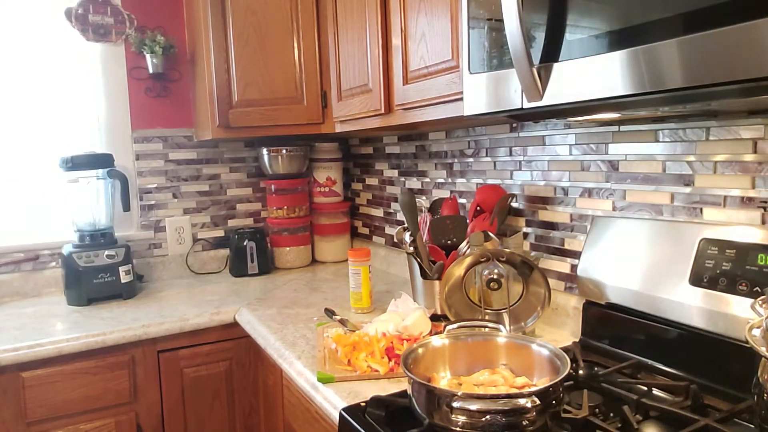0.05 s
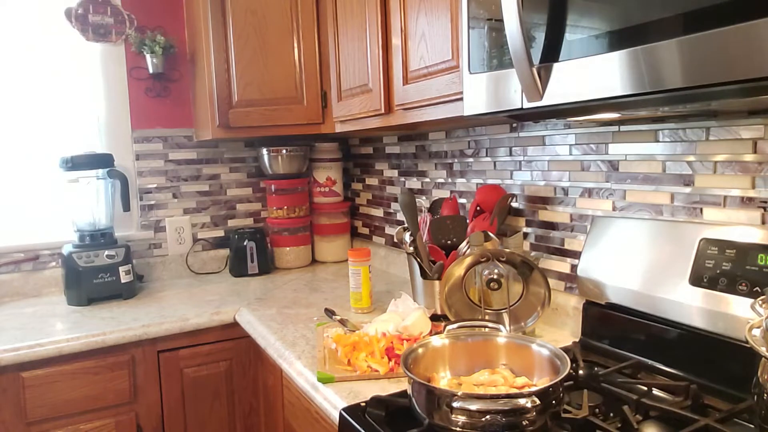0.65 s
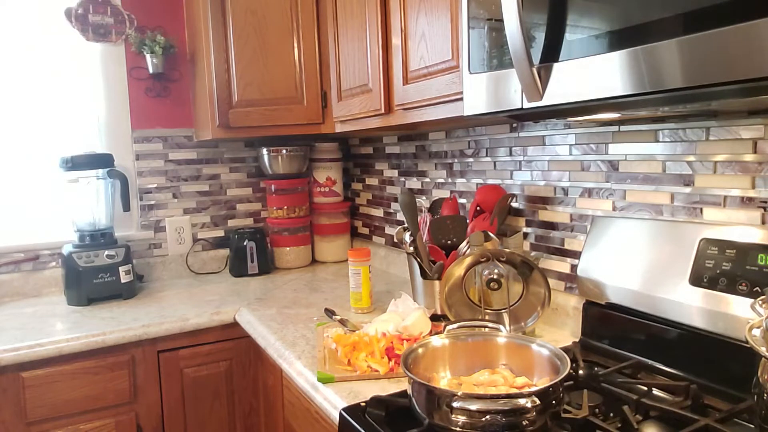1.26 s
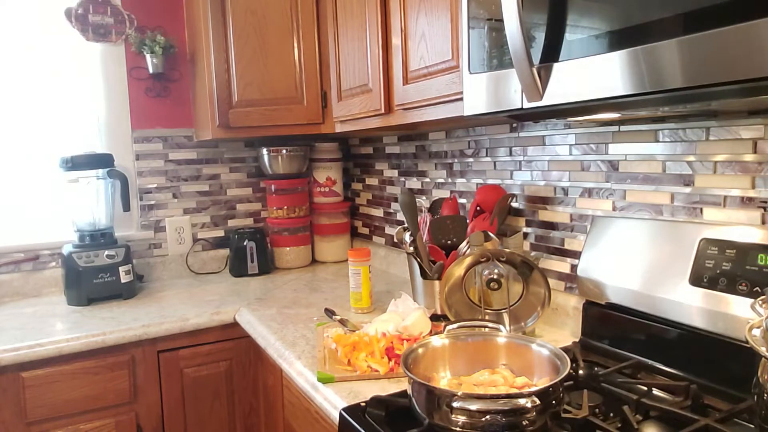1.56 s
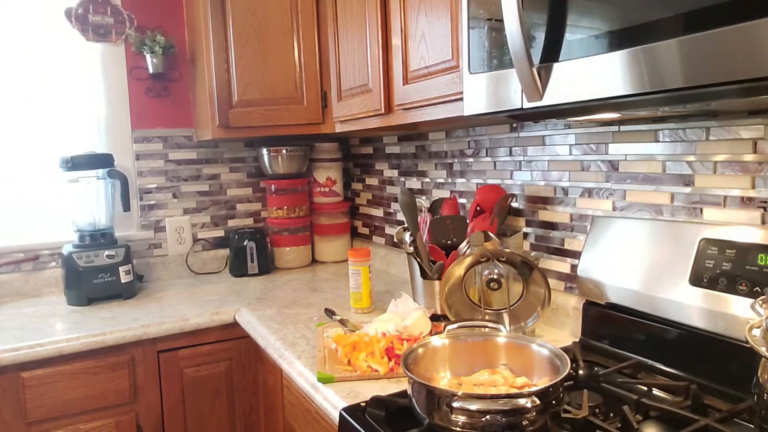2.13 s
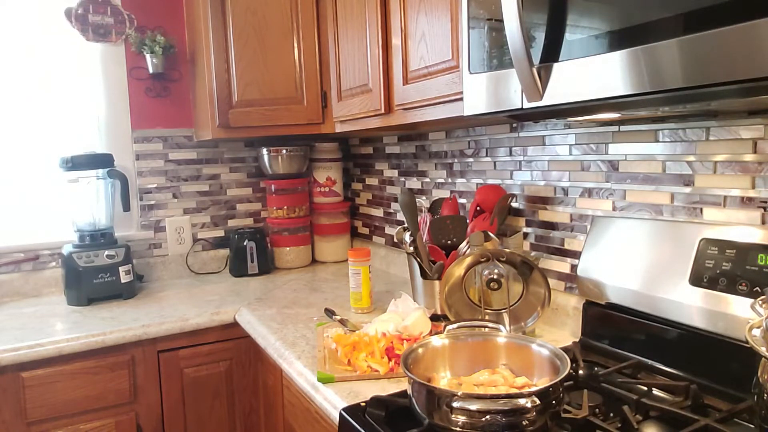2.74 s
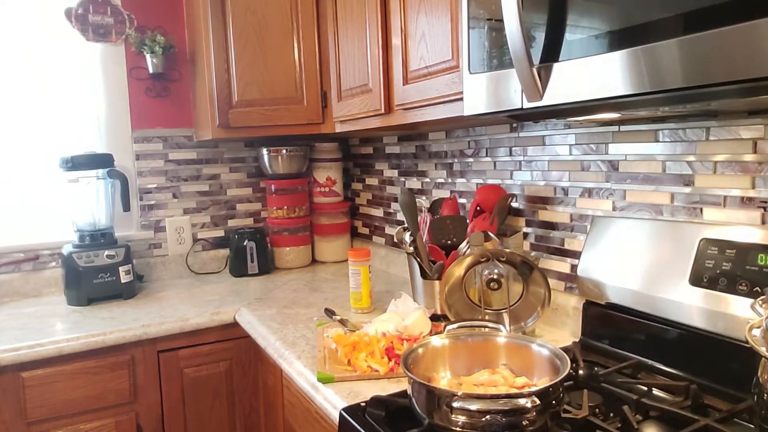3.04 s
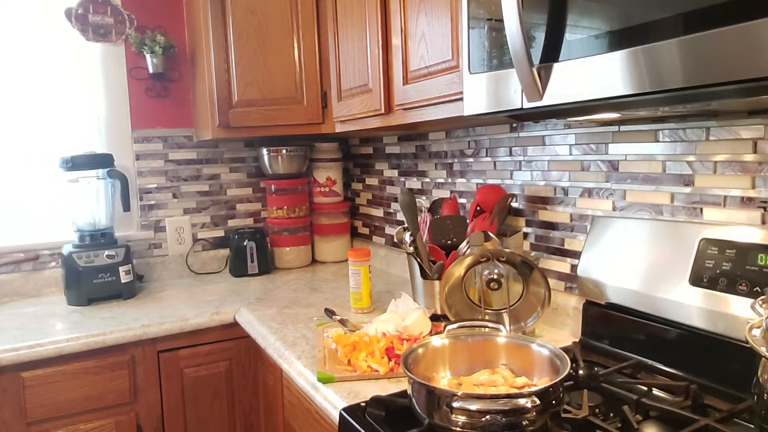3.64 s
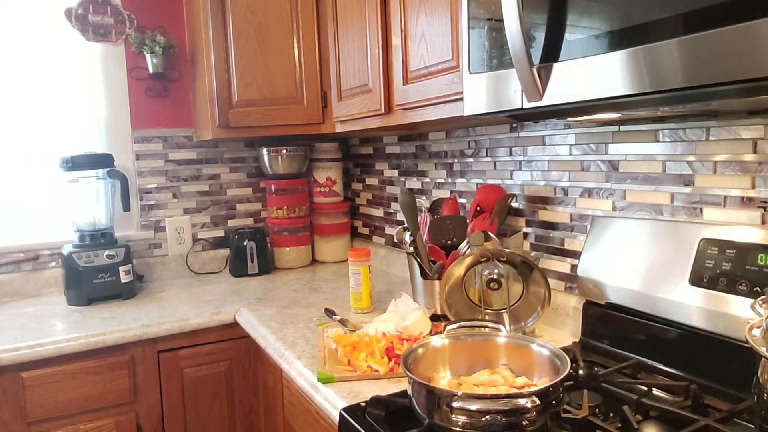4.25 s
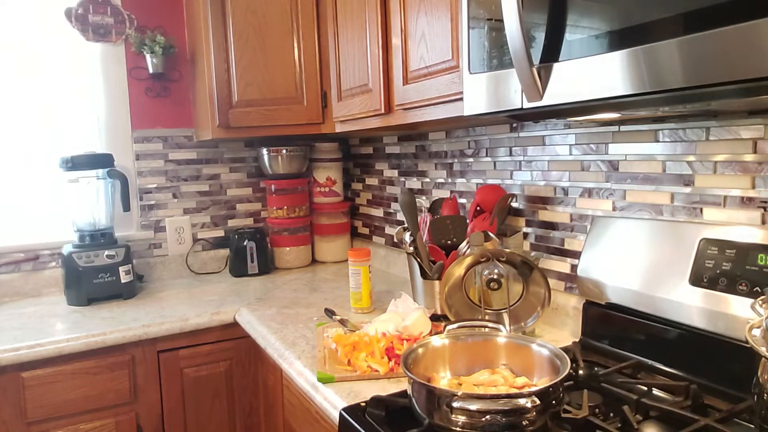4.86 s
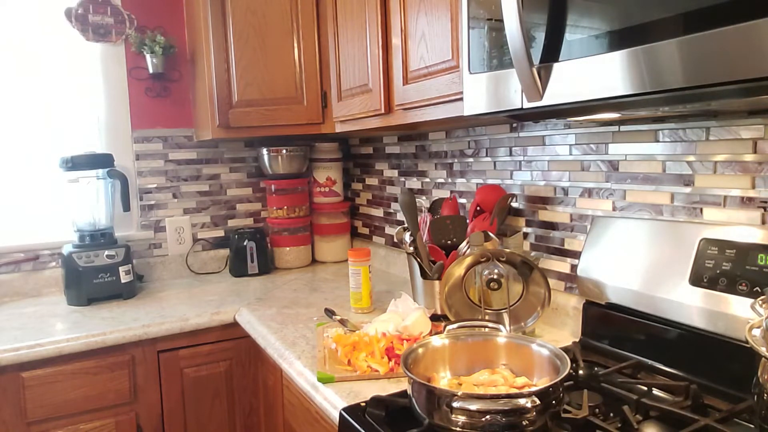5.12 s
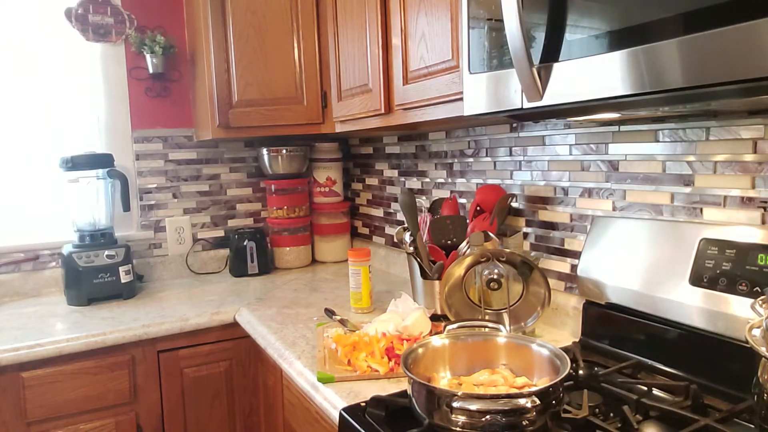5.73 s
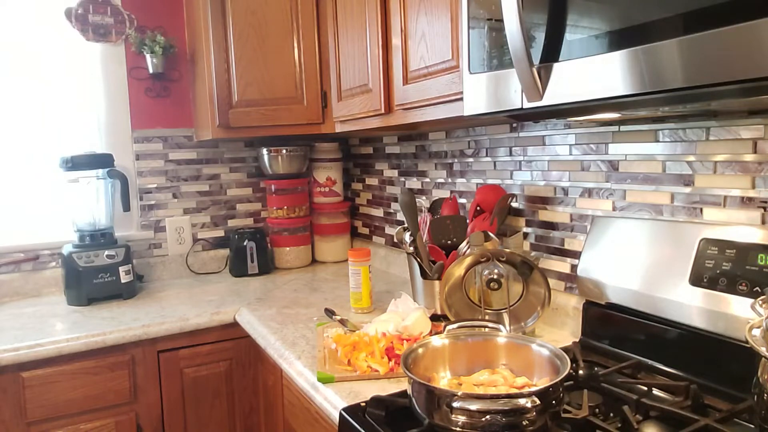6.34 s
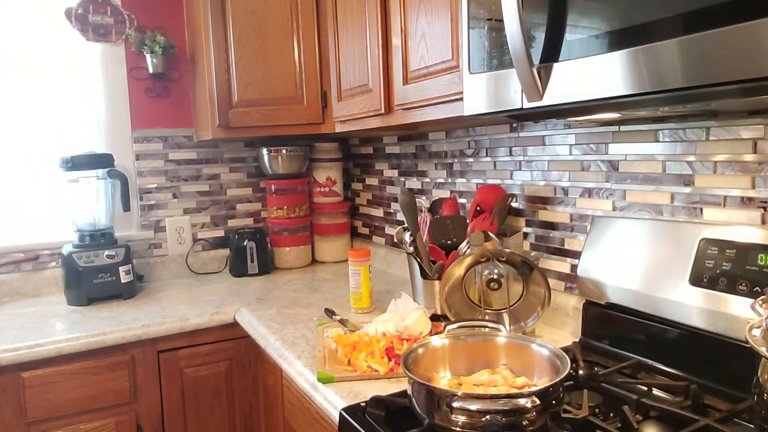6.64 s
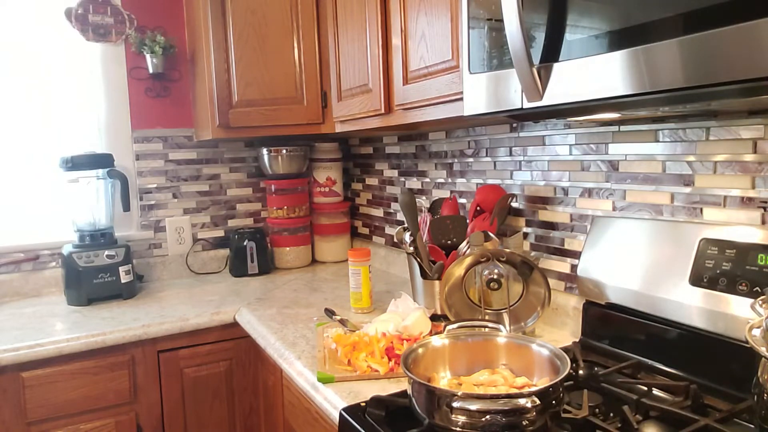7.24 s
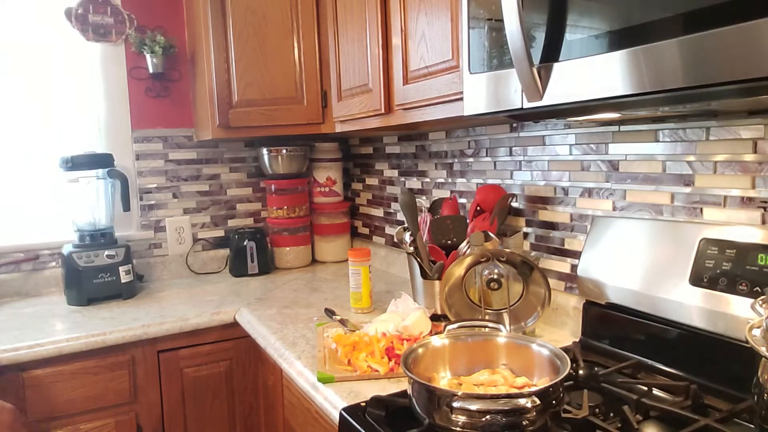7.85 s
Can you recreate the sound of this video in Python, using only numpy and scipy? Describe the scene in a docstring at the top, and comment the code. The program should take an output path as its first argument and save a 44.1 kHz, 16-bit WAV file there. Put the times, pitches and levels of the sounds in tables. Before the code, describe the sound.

Heard from a few steps away in a kitchen, water hisses and splashes off tongs being rinsed in a steel sink, drumming hollowly on the basin. The lever clacks shut, the pipe thumps and the flow dribbles out. Four quick, loud metallic knocks follow as the tongs hit the sink to shake off the water. A faint pan sizzle and low appliance hum lie underneath, with a soft shuffle at the end.

```python
"""A kitchen, a few steps from a steel sink. The tap runs over steel tongs: drops and bubbles splatter,
the jet drums on the basin, and the spray spurts and splashes as the tongs are turned.
The tap is shut with a clack and a thud of the pipe, the last water trickles off, and the tongs are
knocked four times on the sink to dry them, ringing the basin and booming in the cupboard.
An appliance hums and a pan sizzles faintly all along; a soft shuffle comes at the end."""
import sys
import numpy as np
from scipy import signal
from scipy.fft import rfft, irfft, next_fast_len
from scipy.io import wavfile

SR = 44100
rng = np.random.default_rng(int(sys.argv[2]) if len(sys.argv) > 2 else 0)


def digitize_waveform(pressure):
    """Quantize a signal to 16-bit integers and store it at the path in sys.argv[1].

    Rows of a 2-D input are taken as channels; values are limited to [-1, 1].
    """
    field = np.atleast_2d(pressure).T
    bounded = np.clip(field, -1, 1)
    quanta = np.round(bounded * 32767).astype(np.int16)
    wavfile.write(sys.argv[1], SR, quanta)


N = 352028
TIME = np.arange(N) / SR

# EQ curves of the splatter, the fine spray and the drumming basin floor: f/Hz, level/dB
SPLATTER_EQ = [(600, -5), (1400, -6), (1900, -1.5), (3400, 1.5), (5000, -1), (11000, -12.5)]
SPRAY_EQ = [(2500, -20), (5000, -5), (9500, -2), (15500, 0)]
DRUMMING_EQ = [(45, -38), (110, 10.5), (145, -3.5), (245, 8), (400, 4.5), (470, -4.5), (640, 2),
               (850, -4.5), (1300, -7.5), (2500, -23)]
def running_water(jet_db=-54.5):
    """Fine spray hisses, drops and bubbles splatter along with it, the jet drums on the basin floor."""
    spray, jet, calm = spray_strength(), from_db(jet_db) * flow(), lulls()
    surge = rms_one(spray)
    drops = droplets(per_s=1500, spread_db=1, tick_s=0.001, wet_db=-13)
    drops += from_db(-4.5) * bubbles(per_s=800, cycles=140, spread_db=3)
    mist = droplets(per_s=5400, spread_db=2, tick_s=0.00089, wet_db=-7)
    hiss = rms_one(colour(gurgle(mist, depth_db=3, rate_hz=14), SPRAY_EQ))
    splatter = rms_one(colour(gurgle(drops, depth_db=2, rate_hz=18), SPLATTER_EQ))
    return (from_db(7) * jet * calm * surge ** 0.46 * splatter  # large drops swell less than spray
            + from_db(-5) * spray * calm ** 0.57 * hiss
            + from_db(3.5) * jet * surge ** 0.4 * noise(DRUMMING_EQ))


def flow(drain_from_s=5.505, drain_db_per_s=18):
    """Full flow until the tap is shut, then the pipe drains."""
    return from_db(-drain_db_per_s * np.maximum(TIME - drain_from_s, 0))


# spurts of fine spray: t/s, length/s, level/dB
SPURT_CUES = [(0.0, 0.06, -32), (0.055, 0.12, -35.5), (0.393, 0.12, -35), (0.527, 0.19, -37.5),
              (0.769, 0.093, -36.5), (0.937, 0.034, -35), (0.98, 0.16, -41), (1.25, 0.17, -41),
              (1.53, 0.14, -37), (2.577, 0.081, -34), (2.994, 0.28, -37.5), (3.08, 0.095, -36),
              (3.769, 0.043, -36), (4.193, 0.4, -40), (4.65, 0.2, -37), (5.128, 0.14, -35.5)]
def spray_strength(steady_db=-40.5, waver_db=0.85, rise=0.28):
    """Envelope of the spray: it wavers slightly and spurts whenever the tongs cross the jet."""
    pressure = flow() ** 2.5  # fine spray needs pressure, so it dies faster than the jet
    steady = from_db(steady_db + waver_db * drift(1.6)) * pressure
    spurt_power = sum((from_db(db) * swell(np.minimum(TIME - s, 1), length, rise)) ** 2
                      for s, length, db in SPURT_CUES)
    return np.sqrt(steady ** 2 + spurt_power)


# dips where the water slides quietly along the tongs: t/s, level/dB
LULL_CUES = [(0.27, 0), (1.75, -4.5), (2.09, -5), (2.54, -3.5), (3.72, -5), (4.57, -3.5), (4.97, -4)]
def lulls(width_s=0.038):
    """The splatter ducks while the jet clings to the steel."""
    return from_db(sum(db * bump(s, width_s) for s, db in LULL_CUES))


def droplets(per_s, spread_db, tick_s, wet_db, room_decay_s=0.013):
    """Impacts of uneven size, each a tiny white burst with its own room tail; rms 1."""
    sizes = from_db(spread_db * np.minimum(rng.exponential(1, N), 5))
    hits = rng.random(N) < per_s / SR
    energy = linger(sizes ** 2 * hits, tick_s)
    energy += from_db(wet_db) ** 2 * linger(energy, room_decay_s)
    return rms_one(np.sqrt(energy) * room_noise(N))


def bubbles(per_s, cycles, spread_db, span_s=6):
    """Trapped air rings briefly, each bubble at its own pitch and place; rms 1."""
    out, t = np.zeros((2, N)), TIME[:SR // 25]
    for when, pitch, size, place in rng.random((int(per_s * span_s), 4)):
        hz = 1200 * 6 ** pitch
        fade = from_db(-spread_db * np.log(size + .01) - 60 * t * hz / cycles) * np.sqrt(hz)
        add(out, span_s * when, fade * np.sin(2 * np.pi * (hz * t + place * np.array([[0], [1]]))))
    return rms_one(kitchen(out, wet_db=3))


def gurgle(x, depth_db, rate_hz):
    """Bubble sizes come and go: each half octave swells on its own."""
    out, rest = 0, x
    for hz in np.geomspace(1000, 12000, 8):
        below = signal.sosfiltfilt(signal.butter(2, hz, fs=SR, output="sos"), rest)
        out = out + below * from_db(depth_db * drift(rate_hz))
        rest = rest - below
    return rms_one(out + rest)


# splashes off the turning tongs: t/s, length/s, f/Hz, level/dB
SPLASH_CUES = [(0.05, 0.034, 6070, -38.5), (0.094, 0.039, 5500, -39), (0.543, 0.07, 4400, -43.5),
               (0.651, 0.04, 2920, -46.5), (0.941, 0.041, 4180, -43.5), (1.283, 0.035, 7100, -45),
               (1.526, 0.024, 9340, -40), (1.562, 0.045, 2680, -38), (1.793, 0.04, 4550, -46),
               (2.218, 0.017, 7100, -42), (2.271, 0.06, 3680, -44), (2.291, 0.12, 1560, -46),
               (2.764, 0.065, 3120, -39), (3.199, 0.1, 2550, -45), (3.321, 0.038, 6170, -41.5),
               (3.579, 0.08, 3900, -46), (3.763, 0.045, 3580, -39), (3.94, 0.045, 6040, -48),
               (4.094, 0.05, 2950, -44), (4.288, 0.04, 4750, -43), (4.436, 0.088, 1730, -43.5),
               (4.667, 0.045, 5400, -43), (5.06, 0.024, 2900, -44), (5.106, 0.041, 1630, -40.5),
               (5.252, 0.032, 3280, -42.5), (5.319, 0.056, 3360, -39.5), (5.289, 0.053, 900, -43.5),
               (5.35, 0.058, 1530, -38.5), (5.573, 0.036, 6440, -43), (5.605, 0.06, 1100, -49)]
def splashes(rise=0.36, drops_db=-2, plops_db=-7.5):
    """The jet glances off the tongs in bursts of drops and plopping bubbles."""
    spatter, plopping, t = np.zeros((2, N)), np.zeros((2, N)), TIME[:SR // 2]
    drops = droplets(per_s=1500, spread_db=2.5, tick_s=0.0021, wet_db=-6)
    for s, length, hz, level_db in SPLASH_CUES:
        start = round(s * SR)
        envelope = from_db(level_db) * swell(t, length, rise)
        octaves = 0.404 + 6.25 * length  # longer bursts scatter more drop sizes
        burst = rms_one(band(drops[:, start:start + len(t)], hz, octaves))
        add(spatter, s, from_db(drops_db) * envelope * burst)
        plop_gain = from_db(plops_db) * np.sqrt(np.mean(envelope ** 2))
        add(plopping, s, plop_gain * plops(hz, length, octaves / 2))
    return spatter + kitchen(plopping, wet_db=-2)


def plops(hz, length, scatter_octaves, count=7, t60=0.026):
    """A handful of like-sized bubbles, each a short sine ping; rms 1."""
    out = 0
    for when, pitch, size, place in rng.random((count, 4)):
        age = np.maximum(TIME[:SR // 2] - when * length, 0)
        turns = hz * 2 ** (scatter_octaves * (2 * pitch - 1)) * age
        phase = (place - .5) * hz / 800 * np.array([[1], [-1]])
        out = out + size * (age > 0) * from_db(-60 * age / t60) * np.sin(2 * np.pi * turns + phase)
    return rms_one(out)


# the jet is turned onto the basin wall: t/s, level/dB
WALL_CUES = [(0.14, -51.5), (0.56, -54.5), (1.57, -55.5), (2.79, -51.5), (3.09, -49), (4.74, -52)]
def wall_drumming(hz=490, width_s=0.058):
    """Deflected water drums hollowly on the basin wall and excites its middle modes."""
    hollow = noise(resonant(BOOM_EQ, BASIN_MODES, lift_db=6, width=0.02))
    envelope = sum(from_db(db) * bump(s, width_s) for s, db in WALL_CUES)
    return rms_one(band(hollow, hz, octaves=1)) * envelope


# modes of the steel basin and of the arms of the tongs: f/Hz, level/dB
BASIN_MODES = [(119, -7), (178, -0.5), (219, 4.5), (253, 0.5), (355, -6), (425, -3.5), (465, -4),
               (486, -1.5), (538, -8), (629, 2.5), (669, -4), (733, -4.5), (811, -6), (960, -12),
               (1061, -9), (1149, -13)]
TONG_MODES = [(3370, -14), (3595, -14), (4960, -18), (7560, -17), (9010, -13)]
# EQ curves of the hollow boom and the bright clash: f/Hz, level/dB
BOOM_EQ = [(55, -11), (190, 8.5), (800, 3), (1200, -3.5), (1900, -18.5)]
CLASH_EQ = [(250, -10), (1100, 12.5), (1800, -9), (3400, -2), (4400, -8), (7700, -4), (9500, -3),
            (15500, -7)]
# tongs on the sink, one light touch under the water and four knocks to dry them:
# t/s, thump f/Hz, thump level/dB, ring level/dB, clash level/dB, hardness/(dB per octave)
KNOCK_CUES = [(4.392, 597, -39, -45, -46, 1), (6.515, 224, -18, -29, -37, -2),
              (6.7014, 197, -15.5, -28, -32, 1.5), (6.8575, 196, -12.5, -26.5, -45, -1),
              (7.0335, 197, -13.5, -26.5, -34, -0.5)]
def knocks():
    """Each knock flexes and rings the basin, booms in the cupboard and clashes the arms of the tongs."""
    thumps, metal = np.zeros((2, N)), np.zeros((2, N))
    hollow = resonant(BOOM_EQ, BASIN_MODES, lift_db=9, width=0.02)
    clink = resonant(CLASH_EQ, TONG_MODES, lift_db=10, width=0.0083)
    for s, hz, thump_db, ring_db, clash_db, hardness in KNOCK_CUES:
        add(thumps, s, from_db(thump_db) * flex(hz, peak_s=0.0171, width_s=0.0053))
        add(thumps, s, from_db(ring_db) * flex(hz=702, peak_s=0.0085, width_s=0.0041))
        basin = ring(tilted(BASIN_MODES, hardness), t60=0.29, attack_s=0.024)
        boom = rattle(tilted(hollow, hardness), rise_s=0.0064, t60=0.13, tail_db=-11, tail_t60=0.45)
        arms = ring(TONG_MODES, t60=0.17, attack_s=0.0066)
        clash = rattle(clink, rise_s=0.0044, t60=0.071, tail_db=-2.5, tail_t60=0.38)
        add(metal, s, from_db(ring_db - 1.5) * basin + from_db(ring_db + 1.5) * boom)
        add(metal, s, from_db(clash_db) * arms + from_db(clash_db - 2.5) * clash)
    return kitchen(thumps, wet_db=-13.5, t60=0.23, gap_s=0.031) + metal


# modes of the tap lever and EQ curve of its clack: f/Hz, level/dB
LEVER_MODES = [(4270, 0.5), (8940, -7)]
CLACK_EQ = [(200, 14.5), (640, 9.5), (1300, 10), (2300, -3), (4400, 3), (6500, -8), (15500, -18)]
# the lever shuts and the pipe jolts: t/s, level/dB
CLACK_CUES = [(5.388, -29), (5.396, -29), (5.409, -30), (5.433, -38.5)]
def shut_off():
    """The lever clacks home and rings, and the jolt of the pipe booms through sink and cupboard."""
    out, start = np.zeros((2, N)), CLACK_CUES[0][0]
    clack = resonant(CLACK_EQ, BASIN_MODES + LEVER_MODES, lift_db=3, width=0.017)
    for s, db in CLACK_CUES:
        add(out, s, from_db(db) * rattle(clack, rise_s=0.001, t60=0.13, tail_db=-15.5, tail_t60=0.93))
    add(out, start, from_db(-34) * ring(LEVER_MODES, t60=0.21, attack_s=0.0031))
    add(out, start, from_db(-37.5) * ring(BASIN_MODES, t60=0.5, attack_s=0.025))
    add(out, start, from_db(-35.5) * flex(hz=63.6, peak_s=0.04, width_s=0.014))
    return out


def ring(modes, t60, attack_s, damping=0.06, vary_db=2):
    """Struck steel: low modes swell later, as their bending waves are slower, and last longer."""
    t, out = TIME[:SR // 2], 0
    for hz, level_db in modes:
        strength, turn, apart = rng.standard_normal(3)
        ratio = hz / modes[0][0]
        onset = 1 - np.exp(-(t * np.sqrt(ratio) / attack_s) ** 4)
        fade = from_db(level_db + vary_db * strength - 60 * t / t60 * ratio ** damping)
        phase = np.pi * turn + apart * hz / 1600 * np.array([[1], [-1]])
        out = out + fade * onset * np.sin(2 * np.pi * hz * t + phase)
    return out


def rattle(spectrum, rise_s, t60, tail_db, tail_t60):
    """A burst of contact noise that dies fast and lingers in the room."""
    t = TIME[:SR // 2]
    onset = 1 - np.exp(-(t / rise_s) ** 4)
    fade = from_db(-60 * t / t60) + from_db(tail_db - 60 * t / tail_t60)
    return noise(spectrum, len(t)) * fade * onset


def flex(hz, peak_s, width_s):
    """The thump of a heavily damped panel swinging for a few cycles."""
    t = TIME[:SR // 8] - peak_s
    return np.cos(2 * np.pi * hz * t) * np.exp(-.5 * (t / width_s) ** 2)


def resonant(spectrum, modes, lift_db, width):
    """An EQ curve boosted at the modes of a body; width is a share of each mode's pitch."""
    hz = np.geomspace(30, 16000, 4000)
    curve_hz, db = np.transpose(spectrum)
    peaks = np.max([1 / (1 + (np.log(hz / mode_hz) / width) ** 2) for mode_hz, _ in modes], axis=0)
    return np.transpose([hz, np.interp(np.log(hz), np.log(curve_hz), db) + lift_db * peaks])


def tilted(points, db_per_octave):
    """A harder blow favours the upper modes of the basin."""
    return [(hz, db + db_per_octave * np.log2(hz / 400)) for hz, db in points]


# soft shuffling near the stove: t/s, width/s, f/Hz, level/dB
SHUFFLE_CUES = [(7.735, 0.077, 92, -52), (7.923, 0.033, 219, -46)]
def shuffles(octaves=0.18):
    """Soft, low swells of rubbing noise."""
    rub = room_noise(N)
    return sum(from_db(db) * rms_one(band(rub, hz, octaves)) * bump(s, width_s)
               for s, width_s, hz, db in SHUFFLE_CUES)


# tones of the appliance: f/Hz, rms level/dB
HUM_TONES = [(57, -56.5), (296.8, -54.5), (316.5, -59)]
def appliance_hum(waver_db=1.6, waver_rad=0.42):
    """Low tones, each wavering in level and phase."""
    return sum(from_db(db + waver_db * drift(1.8)) * np.sqrt(2)
               * np.sin(2 * np.pi * hz * TIME + waver_rad * drift(0.79)) for hz, db in HUM_TONES)


# EQ curve of the pan: f/Hz, level/dB
SIZZLE_EQ = [(900, -9), (1300, 1), (1900, 4), (2700, 0.5), (9500, -6.5), (15500, -2)]
def pan_sizzle(level_db=-50.5):
    """A dense, fine crackle, heard mostly through the room."""
    crackle = droplets(per_s=4200, spread_db=4, tick_s=0.00049, wet_db=5)
    return from_db(level_db) * rms_one(colour(crackle, SIZZLE_EQ))


# EQ curve of the room air: f/Hz, level/dB
AIR_EQ = [(25, -10), (75, 2.5), (170, 1), (290, 5), (480, -6), (1000, -15), (3000, -38)]
def room_air(level_db=-54.5):
    """A steady bed of low air noise."""
    return from_db(level_db) * noise(AIR_EQ)


def kitchen(x, wet_db, t60=0.28, gap_s=0.011):
    """Direct sound plus a dense tail from tiles and cupboards."""
    t = TIME[:SR // 2]
    tail = room_noise(len(t)) * from_db(-60 * t / t60) * np.clip(t / gap_s - 1, 0, 1)
    tail = rms_one(tail) / np.sqrt(len(t))
    return x + from_db(wet_db) * signal.fftconvolve(x, tail, axes=1)[:, :N]


# stereo image of the room: f/Hz, left-right correlation
ROOM_CORRELATION = [(100, 0.94), (300, 0.92), (700, 0.62), (1500, -0.23), (3000, 0.11)]
def room_noise(size):
    """Diffuse white noise: left and right are alike in the bass, apart in the treble."""
    padded = next_fast_len(size)
    alike = at_hz(ROOM_CORRELATION, padded)
    mid, side = rfft(rng.standard_normal((2, size)), padded)
    pair = np.sqrt((1 + alike) / 2) * mid + np.sqrt((1 - alike) / 2) * side * [[1], [-1]]
    return irfft(pair, padded)[:, :size]


def noise(spectrum, size=N):
    """Coloured room noise, rms 1."""
    return rms_one(colour(room_noise(size), spectrum))


def colour(x, spectrum):
    """Shape a sound by an EQ curve."""
    size = x.shape[-1]
    padded = next_fast_len(size)
    return irfft(rfft(x, padded) * from_db(at_hz(spectrum, padded)), padded)[..., :size]


def at_hz(points, size):
    """A curve read on the frequency grid of a sound of this size."""
    hz, value = np.transpose(points)
    return np.interp(np.log(np.fft.rfftfreq(size, 1 / SR) + 1), np.log(hz), value)


def band(x, hz, octaves):
    """Band-pass around a pitch."""
    edges = np.clip([hz * 2 ** (-octaves / 2), hz * 2 ** (octaves / 2)], 20, .45 * SR)
    return signal.sosfilt(signal.butter(2, edges, "band", fs=SR, output="sos"), x + 1e-18)


def drift(rate_hz, hop=40):
    """Slow random modulation, rms 1."""
    pole = np.exp(-2 * np.pi * hop * rate_hz / SR)
    white = rng.standard_normal(N // hop + 2002)
    slow = signal.lfilter([1], [1, -2 * pole, pole * pole], white)[2000:]
    return np.interp(np.arange(N) / hop, np.arange(len(slow)), rms_one(slow))


def linger(energy, decay_s):
    """Energy dies away exponentially; its sum is kept."""
    pole = np.exp(-1 / (decay_s * SR))
    return signal.lfilter([1 - pole], [1, -pole], energy)


def swell(t, length, rise):
    """Burst envelope: climbs to 1 in the share `rise` of its length, then dies away."""
    age = np.maximum(t, 0) / (rise * length)
    return age * np.exp(1 - age)


def bump(s, width_s):
    """A smooth rise and fall around a time."""
    return np.exp(-.5 * ((TIME - s) / width_s) ** 2)


def add(out, s, sound):
    """Mix a sound in at a time."""
    start = round(s * SR)
    out[:, start:start + sound.shape[-1]] += sound[..., :N - start]


def from_db(db):
    """Decibels to gain."""
    return 10 ** (np.asarray(db) / 20)


def rms_one(x):
    """Scale to unit rms."""
    return x / np.sqrt(np.mean(x ** 2) + 1e-20)


def scene():
    """Water and steel up front, the quiet kitchen behind."""
    sink = running_water() + splashes() + wall_drumming() + shut_off() + knocks()
    return sink + appliance_hum() + pan_sizzle() + room_air() + shuffles()


# resonance of the right microphone port: f/Hz, level/dB
RIGHT_PORT_EQ = [(2000, 1), (5000, 4), (7000, 10.5), (8000, 15), (9200, 18), (10500, 4.5), (11700, 0.5)]
def record(dry, low_cut_hz=42, high_cut_hz=15750):
    """The right port adds its treble resonance; the deepest bass and the top are cut."""
    ports = np.array([dry[0], colour(dry[1], RIGHT_PORT_EQ)])
    ports = signal.sosfilt(signal.butter(4, low_cut_hz, "high", fs=SR, output="sos"), ports)
    return signal.sosfilt(signal.ellip(12, .1, 80, high_cut_hz, fs=SR, output="sos"), ports)


dry = scene()
out = record(dry)
digitize_waveform(out)
```